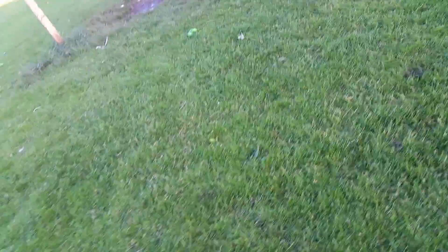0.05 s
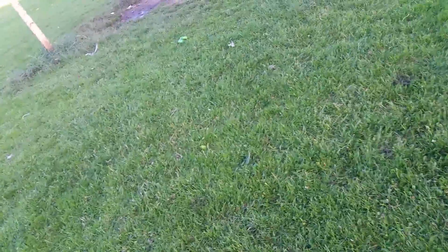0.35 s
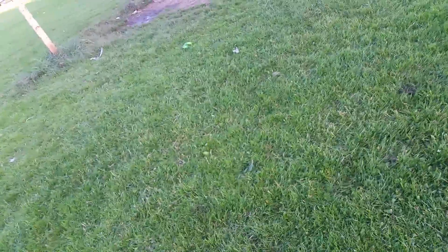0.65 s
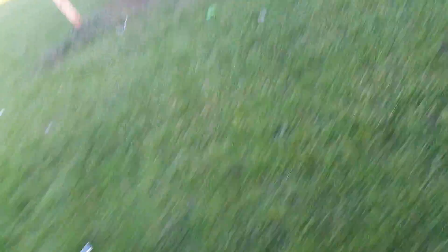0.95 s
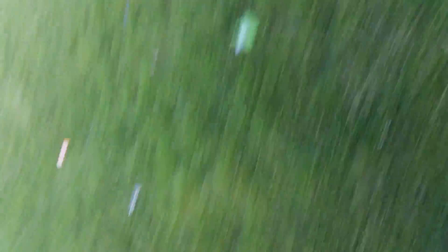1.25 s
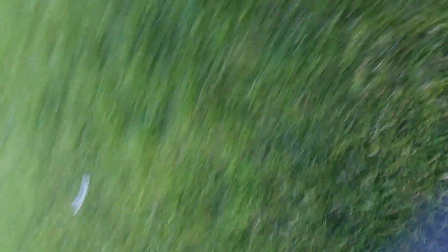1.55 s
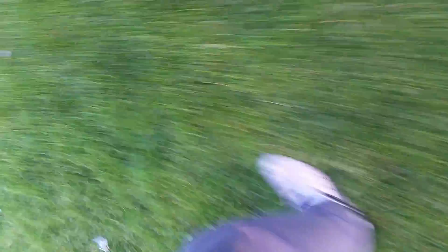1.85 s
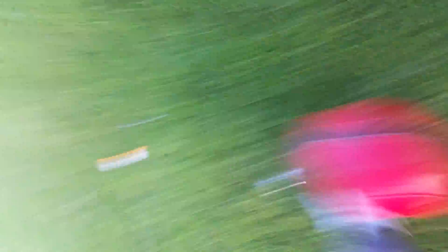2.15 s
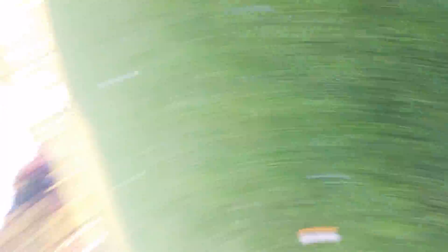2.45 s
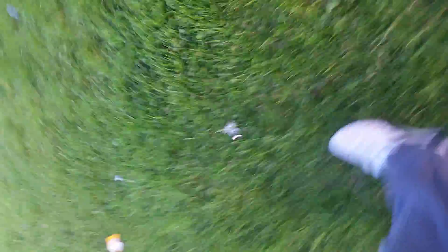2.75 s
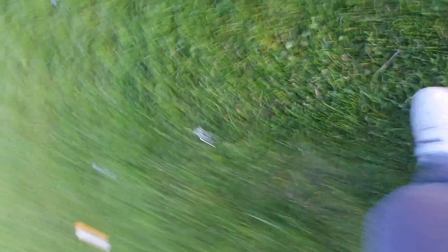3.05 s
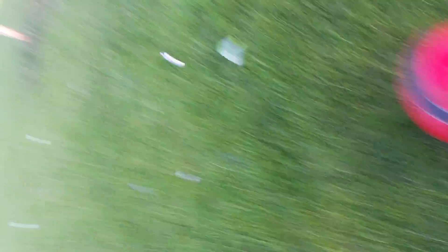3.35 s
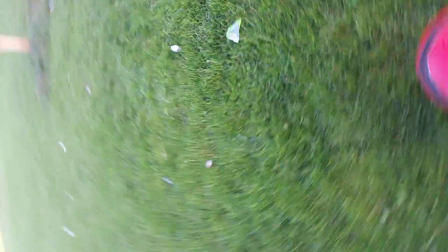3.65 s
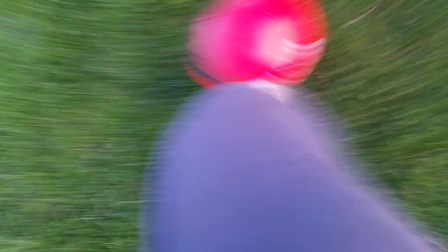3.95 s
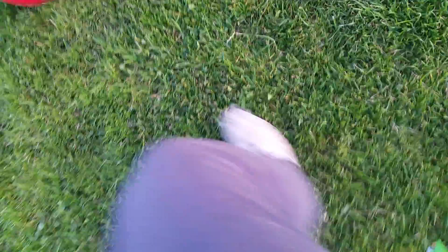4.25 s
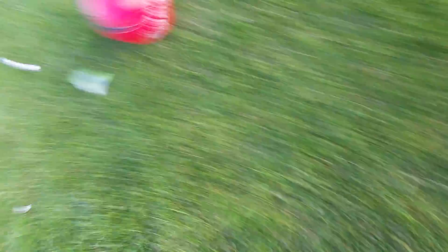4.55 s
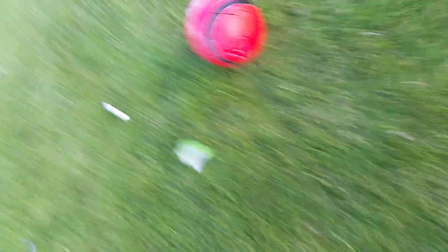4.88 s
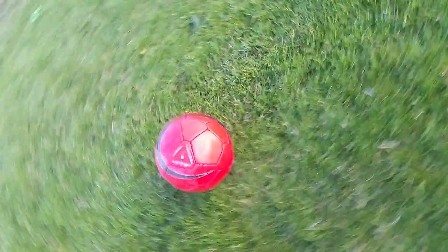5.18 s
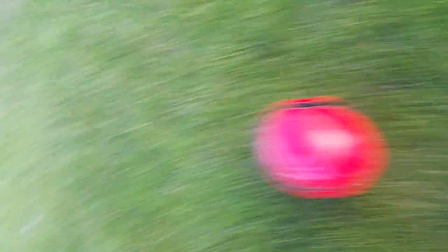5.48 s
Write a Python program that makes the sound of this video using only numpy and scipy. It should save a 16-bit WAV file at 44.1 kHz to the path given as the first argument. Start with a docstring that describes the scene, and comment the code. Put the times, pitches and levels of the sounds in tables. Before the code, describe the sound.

A football is tapped along a lawn with dull thuds, shoes rustling in grass and wind rumbling on the microphone.

```python
"""Dull thuds of a football tapped along a lawn, a step away from a hand-held phone microphone.
Each touch dents the ball, slaps its skin and sets the air inside ringing briefly.
Shoes and clothes rustle close by, the hand rubs on the case and wind rumbles on the microphone.
Far off lie road noise, one faint bird and two engines that pull away near the end."""
import sys
import numpy as np
from scipy import signal
from scipy.fft import rfft, irfft, next_fast_len
from scipy.io import wavfile
from scipy.ndimage import uniform_filter1d

SR = 44100
rng = np.random.default_rng(int(sys.argv[2]) if len(sys.argv) > 2 else 0)


def bounce(signal):
    """Save signal as a 16-bit WAV file at the path given by the first command-line argument."""
    frames = np.transpose(np.atleast_2d(signal))
    limited = np.clip(frames, -1, 1)
    pcm = np.round(limited * 32767).astype(np.int16)
    wavfile.write(sys.argv[1], SR, pcm)


N = 252103

# The main engine, far off. Each row: time in seconds, firing rate in Hz, level in dB.
MAIN_ENGINE = [(0, 112.6, -44.5), (1.9, 117.5, -47), (2.15, 118.8, -33), (2.42, 111.4, -35),
               (2.58, 116.8, -44), (3.4, 118.9, -41.5), (3.8, 114.6, -38.5), (4.35, 122.5, -41.5),
               (4.6, 117.9, -58), (4.85, 115, -44), (5.05, 134.3, -33.5), (5.72, 183.4, -35.5)]
# Low rumble of wind and exhaust. Each row: frequency in Hz, relative density in dB.
RUMBLE_COLOUR = [(60, -16), (105, 1), (140, 2), (180, -3.5), (240, -13.5), (330, -22.5), (500, -42.5),
                 (1000, -60.5)]
# The noise of a slap or tick at close range. Each row: frequency in Hz, relative density in dB.
SLAP_COLOUR = [(100, -15), (600, 12.5), (900, 15.5), (1300, 8.5), (1900, -7.5), (2650, -3.5), (3300, -17),
               (4400, -9), (6000, -30), (8000, -12.5), (10000, -27), (12500, -5), (16000, -12.5)]


def undb(db):
    """Decibels to gain."""
    return 10 ** (np.asarray(db) / 20)


def curves(table):
    """The columns after a table's time column, joined by straight lines."""
    s, *columns = np.transpose(table)
    return [np.interp(np.arange(N) / SR, s, c) for c in columns]


def unit(x):
    """Scale to rms 1."""
    return x / np.sqrt(np.mean(x ** 2))


def pan(db):
    """Channel gains for a left minus right level difference, at constant power."""
    return unit(undb(np.array([[db], [-db]]) / 2))


def noise(colour):
    """Noise of rms 1 with a spectrum of (Hz, dB) points that falls away beyond its ends."""
    hz, db = np.transpose(colour)
    octave, points = np.log2(np.arange(N // 2 + 1) * SR / N + 1), np.log2(hz)
    beyond = np.abs(octave - np.clip(octave, points[0], points[-1]))
    size = next_fast_len(N)
    gain = undb(np.interp(octave, points, db) - 20 * beyond)
    gain = np.interp(np.linspace(0, 1, size // 2 + 1), np.linspace(0, 1, len(gain)), gain)
    return unit(irfft(gain * rfft(rng.standard_normal(size)), size)[:N])


def wide(colour, side_db):
    """Stereo noise: a shared part and a part of opposite sign."""
    return noise(colour) + undb(side_db) * noise(colour) * np.array([[1], [-1]])


def drift(rate):
    """Random levels held 1 / rate seconds and smoothed twice; rms 1."""
    hold = max(int(SR / rate), 1)
    steps = np.repeat(rng.standard_normal(N // hold + 1), hold)
    return unit(uniform_filter1d(uniform_filter1d(steps, hold), hold)[:N])


def swell(s, rise_s, fall_s, shape=1.2):
    """A rounded rise to 1 at time s and a fall after it."""
    t = np.arange(N) / SR - s
    return np.exp(-np.minimum(np.abs(t) / np.where(t < 0, rise_s, fall_s), 20) ** shape)


def ring(t, modes):
    """Free decay of (Hz, dB, t60 in seconds) modes."""
    return sum(undb(db) * np.cos(2 * np.pi * hz * t) * np.exp(-np.log(1000) * t / t60)
               for hz, db, t60 in modes)


def at_level(hit, db):
    """Set the level of a hit, with its energy taken over 25 ms."""
    return hit * undb(db) / np.sqrt(np.sum(hit ** 2) / (.025 * SR))


def add(out, s, x):
    """Mix a sound in at time s."""
    i = int(s * SR)
    out[:, i:i + x.shape[-1]] += x[..., :N - i]


def road(cruise_hz=112.5, rumble_db=-45.5, db_per_octave=26, hiss_db=-72):
    """Far tyre noise, exhaust rumble that grows with the revs, and faint hiss, mostly in the left port."""
    # Tyres and port hiss. Each row: frequency in Hz, relative density in dB.
    tyre_colour = [(200, -2), (350, 1), (550, -2), (800, 0), (1020, 3), (1350, -5.5), (1900, -13),
                   (2800, -24), (4000, -32)]
    port_colour = [(2500, -12.5), (3300, -10.5), (3800, 2.5), (4150, -5.5), (4600, -18), (6000, -30.5)]
    # The road as heard from the lawn. Each row: time in seconds, level in dB.
    tyre_level = [(0, -56), (1.0, -57), (1.85, -54.5), (2.25, -59), (2.9, -56.5), (3.7, -55.5), (4.2, -58),
                  (5.0, -57), (5.72, -55.5)]
    tyres = wide(tyre_colour, -0.91) * pan(2.7) * undb(curves(tyre_level)[0] + 1.75 * drift(3.3))
    rev_octaves = np.log2(curves(MAIN_ENGINE)[0] / cruise_hz)
    rumble = wide(RUMBLE_COLOUR, -11.5) * undb(rumble_db + db_per_octave * rev_octaves)
    return tyres + rumble + wide(port_colour, -1.1) * pan(6.6) * undb(hiss_db)


def exhaust(track, orders, waver=0.0091, fade_db=2.0):
    """The low exhaust note of a far vehicle, wavering in the moving air."""
    hz, db = curves(track)
    phase = 2 * np.pi * np.cumsum(hz * (1 + waver * drift(22))) / SR
    return sum(undb(db + order_db + fade_db * drift(12)) * np.sqrt(2) * np.sin(order * phase)
               for order, order_db in orders)


def engines():
    """Two distant vehicles whose notes climb as they pull away."""
    # The second engine comes up late. Each row: time in seconds, firing rate in Hz, level in dB.
    second_engine = [(0, 100, -83.5), (4, 103, -62), (4.2, 107.7, -48), (4.65, 120.2, -50),
                     (4.9, 130.6, -48), (5.72, 151, -48)]
    # Exhaust partials. Each row: multiple of the firing rate, relative level in dB.
    main_orders = [(.5, -9), (1, -0.5), (1.5, -16.5), (2, -32.5)]
    second_orders = [(1, 3), (2, -9.5), (3, -25.5)]
    return exhaust(MAIN_ENGINE, main_orders) + exhaust(second_engine, second_orders)


def bird(waver=0.002):
    """One thin rising whistle from far away, almost a pure tone."""
    # The call. Each row: time in seconds, pitch in Hz, level in dB.
    whistle = [(2.09, 5100, -100), (2.13, 5400, -88), (2.23, 5560, -81), (2.275, 5640, -72),
               (2.325, 5660, -76), (2.36, 5760, -100)]
    hz, db = curves(whistle)
    phase = 2 * np.pi * np.cumsum(hz * (1 + waver * drift(120))) / SR
    t = np.arange(N) / SR
    return pan(2) * undb(db) * np.sin(phase) * (t > whistle[0][0]) * (t < whistle[-1][0])


def wind(deep_db=1.5, upper_db=1, flutter_db=1.5, upper_flutter_db=0.93):
    """Eddies rumble right on both microphone ports, with a few sudden puffs."""
    # Wind strength. Each row: time in seconds, relative level in dB.
    gusts = [(0, -52), (0.75, -49.5), (1.25, -42.5), (1.6, -46.5), (2.3, -39), (2.6, -36), (3.15, -40.5),
             (3.7, -48.5), (4.25, -41.5), (4.55, -53.5), (5.15, -43), (5.72, -39.5)]
    # The deepest rumble. Each row: frequency in Hz, relative density in dB.
    deep_colour = [(15, -29.5), (35, -7.5), (60, -4.5), (90, -0.5), (130, -14.5), (250, -31)]
    # Puffs. Each row: peak time in seconds, level in dB, half-width in seconds, centre in Hz.
    puffs = [(2.54, -23, 0.015, 186.5), (2.562, -22.5, 0.005, 172), (2.657, -26.5, 0.0037, 155),
             (2.905, -29.5, 0.0078, 108.5)]
    strength, = curves(gusts)
    out = wide(deep_colour, -6) * undb(strength + deep_db + flutter_db * drift(15)) * pan(-1.5)
    out += wide(RUMBLE_COLOUR, -9.0) * undb(strength + upper_db + upper_flutter_db * drift(18))
    t = np.arange(N) / SR
    for s, db, width_s, hz in puffs:
        eddy = wide([(hz / 2, -8), (hz, 0), (2 * hz, -21), (4 * hz, -48)], -1.8)
        out += eddy * undb(db) * np.exp(-((t - s) / width_s) ** 2 / 2)
    return out


def hand_rub():
    """Handling noise: the hand rubs on the case, right beside the microphone."""
    # Rubs. Each row: peak time in seconds, level in dB, rise and fall in seconds.
    rubs = [(0.03, -61, 0.13, 0.16), (1.46, -51, 0.12, 0.17), (1.82, -52.5, 0.055, 0.037),
            (2.2, -56.5, 0.16, 0.29), (2.5, -47.5, 0.014, 0.031), (2.64, -59, 0.24, 0.16),
            (4.55, -59.5, 0.034, 0.073), (4.87, -55, 0.027, 0.042)]
    # Skin on the case. Each row: frequency in Hz, relative density in dB.
    grip_colour = [(200, -4.5), (450, -0.5), (800, -7.5), (1050, -10), (1350, -2), (1650, -6),
                   (2050, -25.5), (4000, -31)]
    power = sum((undb(db) * swell(s, rise_s, fall_s)) ** 2 for s, db, rise_s, fall_s in rubs)
    return wide(grip_colour, 0.54) * pan(5.0) * np.sqrt(power)


def rustle_and_ticks(cloth_scrape_db=-17, cloth_pan_db=3):
    """Close grass and cloth, and the treble of the ball's slap: a scrape and a hiss each port colours."""
    # Cloth hiss, following the player's pace. Each row: time in seconds, level in dB.
    cloth_level = [(0, -74), (0.7, -77), (1.5, -60.5), (3.1, -63.5), (4.3, -67.5), (4.6, -58.5),
                   (5.72, -61)]
    # Swishes of shoe and cloth through grass, plus a crisp high tick at each ball touch.
    # Each row: peak time in seconds, hiss in dB, rise and fall in seconds,
    # scrape against the hiss in dB, left minus right in dB.
    bursts = [(0.775, -68, 0.013, 0.022, -17, -3), (0.811, -44, 0.00077, 0.0019, -13, -9),
              (1.11, -60.5, .02, 0.031, -36.5, -13), (1.47, -45, 0.14, 0.18, -28.5, -7.5),
              (1.575, -50, .04, 0.052, -9.5, -9), (1.594, -36, 0.0033, 0.008, -32, -4),
              (1.645, -37, .015, 0.07, -22.5, -16), (1.795, -34.5, 0.046, 0.069, -24, -2.5),
              (1.87, -41.5, 0.072, 0.04, -16.5, -4), (2.164, -27.5, 0.0017, 0.0075, -21, -1),
              (2.19, -45, 0.016, 0.037, -19, -9), (2.379, -42, 0.037, 0.052, -21.5, -10),
              (2.59, -49, 0.11, 0.062, -26, -16), (2.85, -53.5, 0.052, .035, -19, -17),
              (2.92, -52.5, .02, 0.057, -17.5, -13), (3.07, -45, 0.056, 0.11, -20.5, -12),
              (3.522, -56, 0.086, 0.086, -37, -13), (3.73, -58, 0.058, 0.05, -23, -14),
              (3.84, -58, 0.05, 0.064, -20, -12), (4.0455, -36, 0.00078, 0.0016, -23, -17),
              (4.09, -56.5, 0.019, 0.094, -19, -13), (4.51, -44.5, .06, 0.039, -23, -12),
              (4.70, -56.5, 0.13, 0.067, -28, -18), (4.865, -39.5, 0.03, 0.019, -26, -11),
              (4.99, -50, 0.019, 0.062, -27, -14), (5.22, -50, 0.091, 0.19, -26, -18),
              (5.411, -50, 0.039, 0.039, -33, -17), (5.523, -39.5, 0.031, 0.14, -34, -8),
              (5.66, -42.5, 0.077, 0.074, -23.5, -12)]
    # Hiss at each port, and the scrape. Each row: frequency in Hz, relative density in dB.
    left_colour = [(4000, -33.5), (6500, -27), (7900, -8.5), (9200, -20.5), (12000, 3), (15500, 6.5)]
    right_colour = [(4000, -31.5), (9000, -37), (10300, -20), (11300, -7.5), (12300, -0.5), (13800, -5),
                    (16000, -11)]
    scrape_colour = [(600, -12.5), (1700, 12.5), (3000, 7), (5000, 4), (6500, 1), (9500, 0.5), (13000, -12)]
    cloth = undb(curves(cloth_level)[0])
    hiss_power = (pan(cloth_pan_db) * cloth) ** 2
    scrape_power = (undb(cloth_scrape_db) * cloth) ** 2
    for s, db, rise_s, fall_s, scrape_db, pan_db in bursts:
        burst = undb(db) * swell(s, rise_s, fall_s)
        hiss_power += (pan(pan_db) * burst) ** 2
        scrape_power += (undb(scrape_db) * burst) ** 2
    hiss = np.array([noise(left_colour), noise(right_colour)]) * np.sqrt(hiss_power)
    return hiss + wide(scrape_colour, -1) * np.sqrt(scrape_power)


def knocks(tick_s=0.0013, snap_s=0.00075):
    """A hard double knock close to the microphone: each contact ticks and rings hollow."""
    # Contacts. Each row: start in seconds, ring level in dB, tick level in dB.
    contacts = [(3.0468, -39.5, -51), (3.0529, -32, -39.5)]
    # The hollow ring. Each row: frequency in Hz, relative level in dB, t60 in seconds.
    hollow_modes = [(260, -25, .035), (520, 12, 0.02), (600, 3, 0.026), (1120, -1.5, 0.019),
                    (1330, -1.5, 0.022), (2260, -4, 0.0068), (3778, -11.5, 0.017), (4280, -3, 0.0072)]
    out, t = np.zeros((2, N)), np.arange(SR // 8) / SR
    hollow = (1 - np.exp(-t / snap_s)) * ring(t, hollow_modes)
    for s, db, tick_db in contacts:
        tick = wide(SLAP_COLOUR, -0.89)[:, :len(t)] * np.exp(-t / tick_s)
        add(out, s, pan(7.0) * at_level(hollow, db) + at_level(tick, tick_db))
    return out


def smacks():
    """The shoe squeezes out the air: each flat smack is a single cusp of pressure."""
    # Smacks. Each row: peak time in seconds, peak level in dB, rise and fall time in seconds.
    cusps = [(2.1646, -8.5, .0007), (3.0540, -14, 0.00047)]
    t = np.arange(N) / SR
    return sum(pan(4.4) * undb(db) * np.exp(-np.abs(t - s) / width_s) for s, db, width_s in cusps)


def ball(thud_s=.028, brake_s=0.0033, scuff_s=0.031, scuff_db=-24, snap_s=0.00024):
    """The foot dents the ball: it heaves, the shell bends, the skin slaps and the air inside rings."""
    # Touches, a step from the microphone. Each row: start in seconds, thud in dB, thud pitch in Hz,
    # shell in dB, shell tuning ratio, contact in seconds, relative slap level in dB,
    # slap decay in seconds, air ring in dB, left minus right in dB.
    touches = [(0.8101, -18.5, 72.5, -24, 1.08, 0.0014, -46, 0.0016, -59.5, 2.5),
               (1.5908, -21.5, 71, -17.5, 0.99, 0.0033, -37.5, 0.0098, -54, 2),
               (2.1602, -20, 69.4, -30, 0.98, 0.0017, -29.5, 0.0009, -34.5, -1.5),
               (2.1630, -29.5, 132, -36.5, 1.7, 0.00061, -32, 0.0012, -47, -0.5),
               (4.0452, -35, 88.2, -30.5, 0.814, 0.002, -37.5, 0.0018, -57, -4.5)]
    # Modes of the shell and the air in it. Each row: frequency in Hz, relative dB, t60 in seconds.
    shell_modes = [(152, 12, 0.028), (250.4, -6.5, 0.074), (358.4, 3, 0.057), (525, -24, 0.096),
                   (646, -3, .025), (896, 4, 0.019)]
    air_modes = [(474.5, -3, 0.24), (841, 6.5, 0.054), (1180, 2.5, 0.095), (1391.4, -18, 0.013),
                 (1584, 1, 0.064), (2320, -5, 0.059), (2560, 8, 0.016), (2700, -19, 0.023),
                 (3870, -25, 0.079)]
    out, t = np.zeros((2, N)), np.arange(SR // 3) / SR
    # foot and turf stop the heave after a few cycles
    brake = np.sin(np.pi / 2 * np.clip((thud_s - t) / brake_s, 0, 1)) ** 2
    onset = 1 - np.exp(-t / snap_s)
    air = onset * ring(t, air_modes)
    for s, thud_db, thud_hz, shell_db, tuning, contact_s, slap_db, slap_s, air_db, pan_db in touches:
        heave = -np.cos(2 * np.pi * thud_hz * t) * (1 - np.exp(-(t / contact_s) ** 2)) * brake
        # a longer push leaves the higher shell modes quiet; a hard toe tunes them up
        push = np.sin(np.pi * t / contact_s) * (t < contact_s)
        tuned_modes = [(hz * tuning, db, t60) for hz, db, t60 in shell_modes]
        shell = -signal.fftconvolve(push, ring(t, tuned_modes))[:len(t)]
        slap_decay = np.exp(-t / slap_s) + undb(scuff_db) * np.exp(-t / scuff_s)
        slap = wide(SLAP_COLOUR, -1)[:, :len(t)] * pan(4.5) * onset * slap_decay
        body = at_level(heave, thud_db) + at_level(shell, shell_db) + at_level(air, air_db)
        add(out, s, pan(pan_db) * (body + at_level(slap, slap_db + 1.5)))
    return out


def scene():
    """The ball and the player in front, wind on the microphone, traffic and a bird far behind."""
    traffic = road() + engines()
    hits = ball() + knocks() + smacks()
    grain = undb(1.35 * drift(900) + drift(60))  # a fast flicker in level
    close_noise = grain * (rustle_and_ticks() + hand_rub())
    return hits + close_noise + wind() + traffic + bird()


def record(dry, low_cut_hz=18, top_hz=15950):
    """The phone cuts the deepest bass and the top."""
    dry = signal.sosfilt(signal.butter(1, low_cut_hz, "high", fs=SR, output="sos"), dry)
    return signal.sosfilt(signal.ellip(10, .2, 70, top_hz, fs=SR, output="sos"), dry)


dry = scene()
out = record(dry)
bounce(out)
```